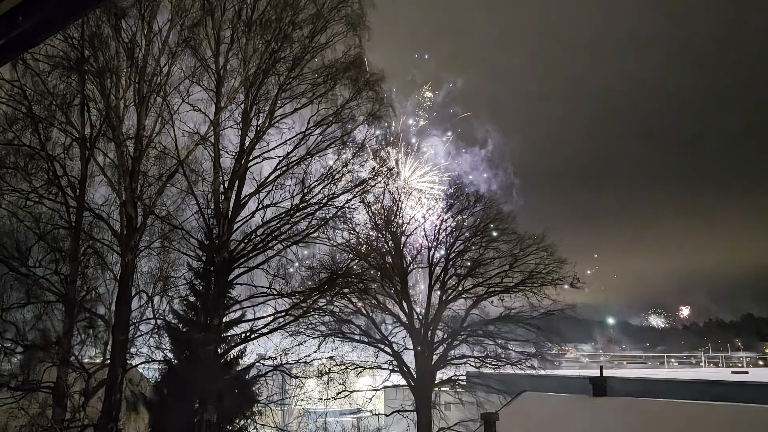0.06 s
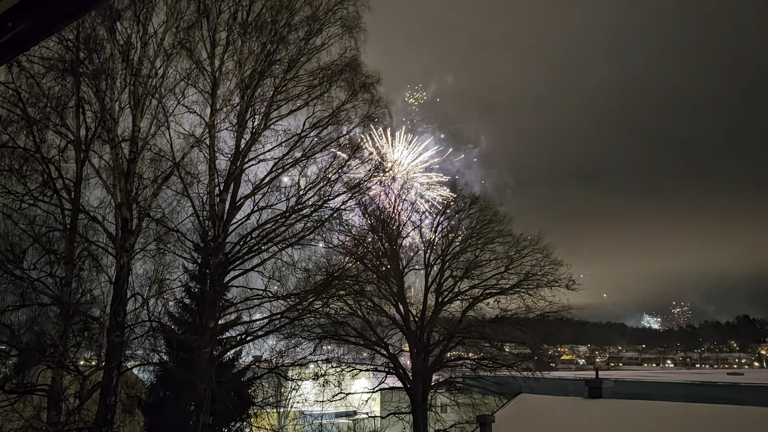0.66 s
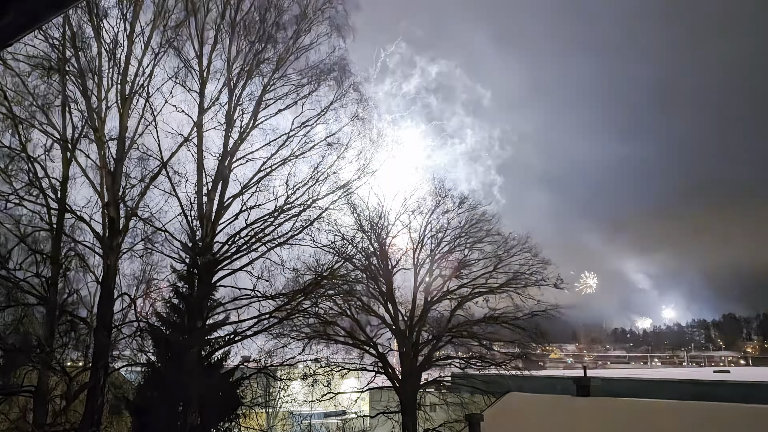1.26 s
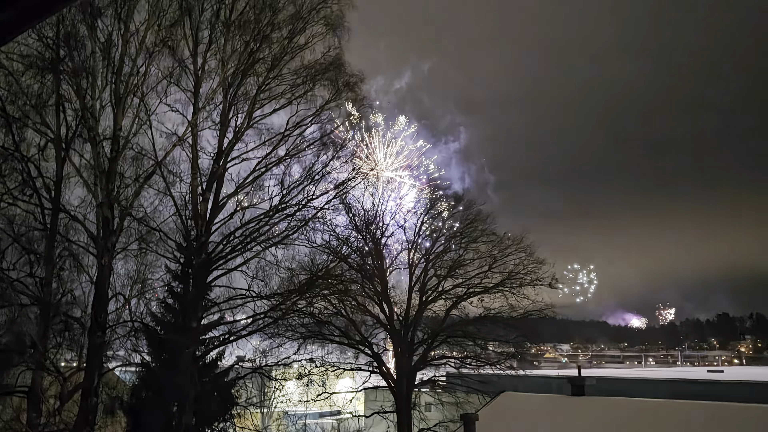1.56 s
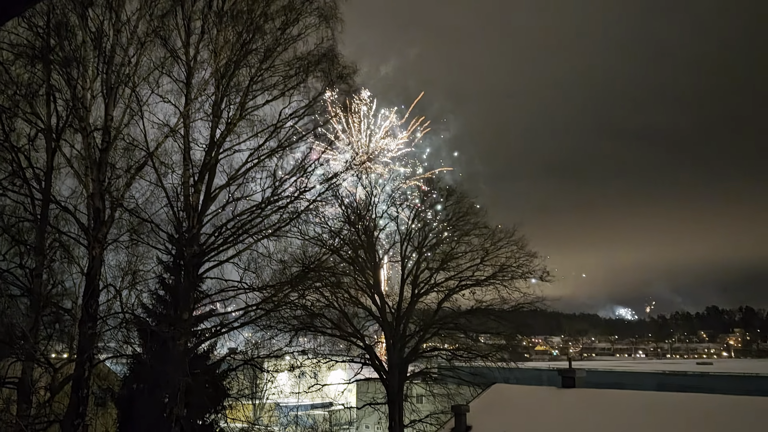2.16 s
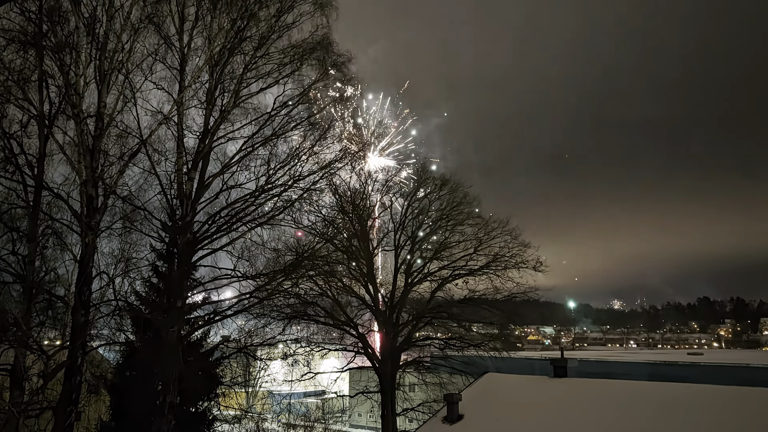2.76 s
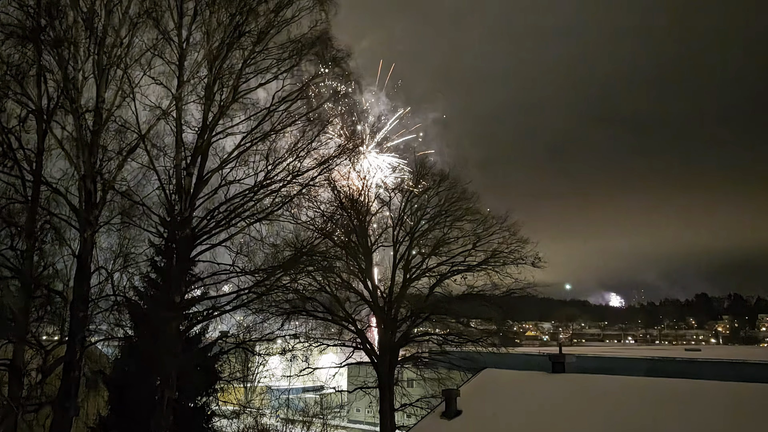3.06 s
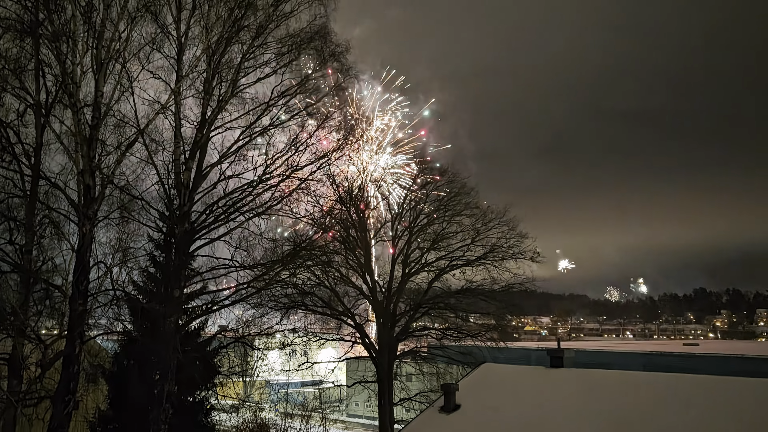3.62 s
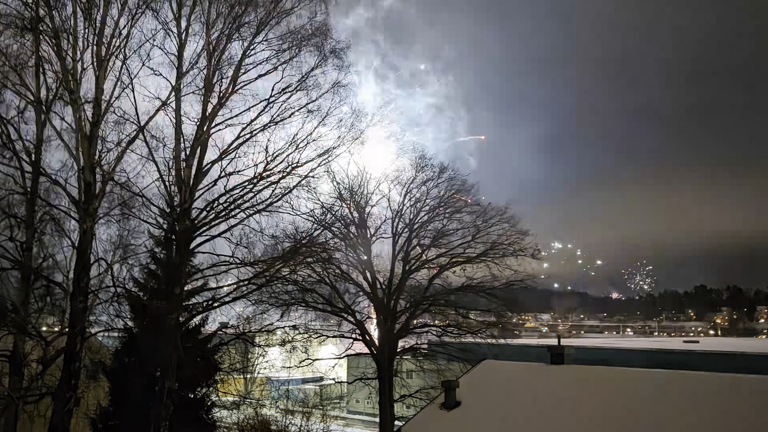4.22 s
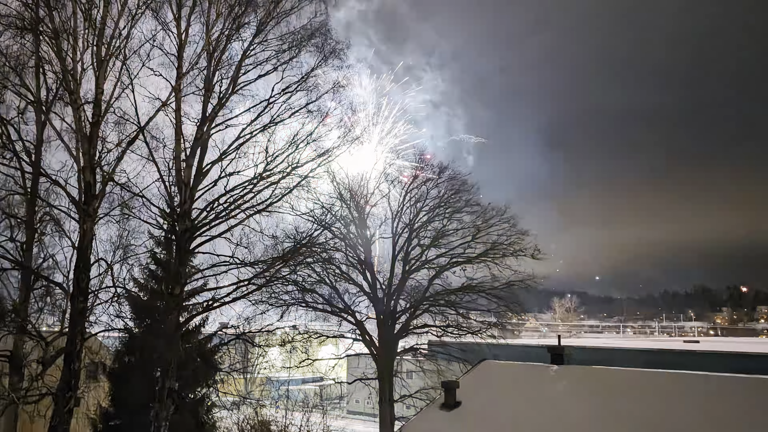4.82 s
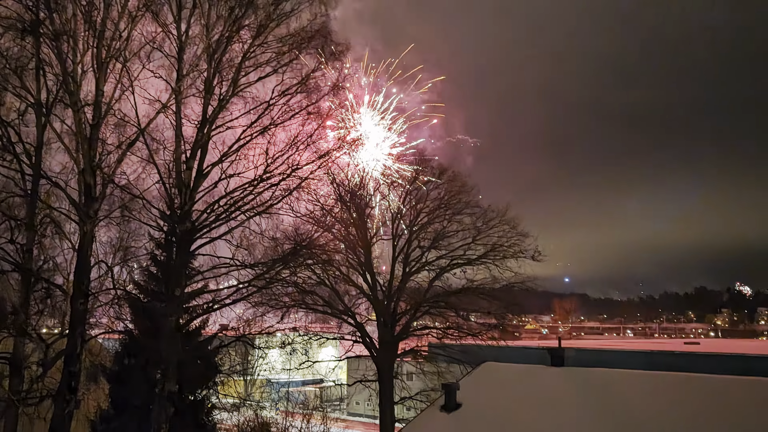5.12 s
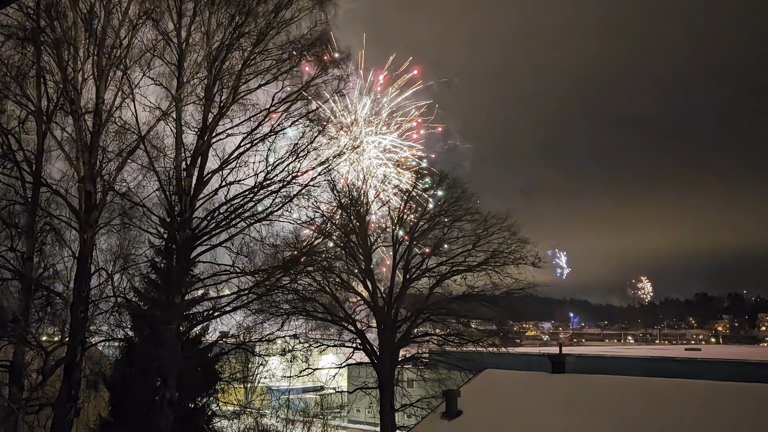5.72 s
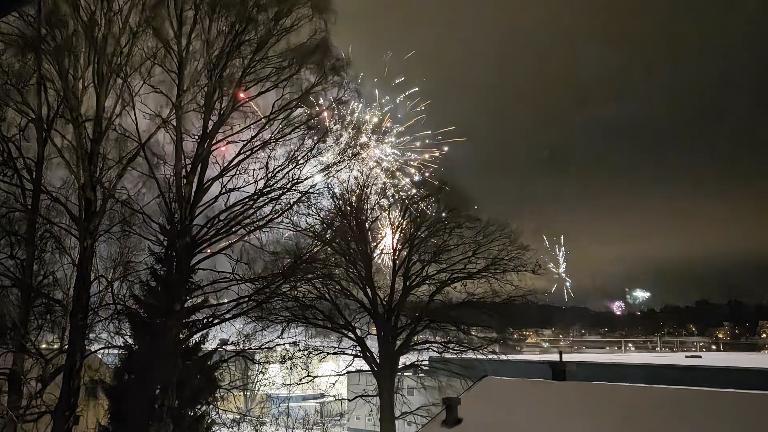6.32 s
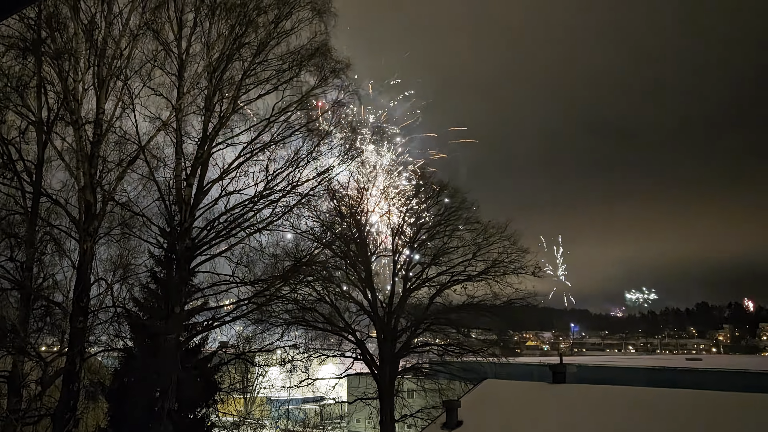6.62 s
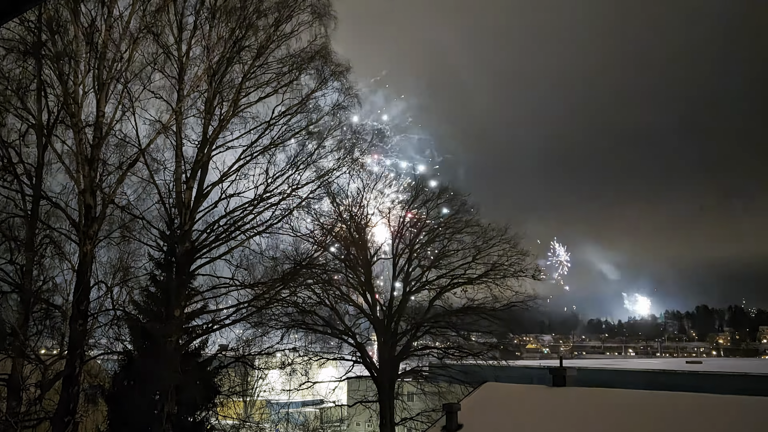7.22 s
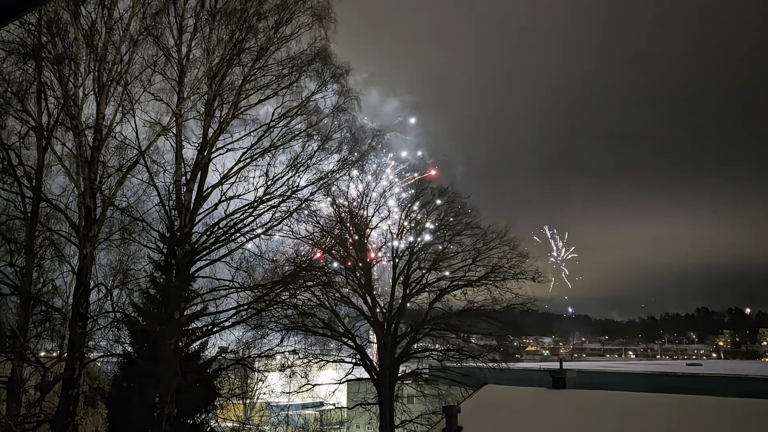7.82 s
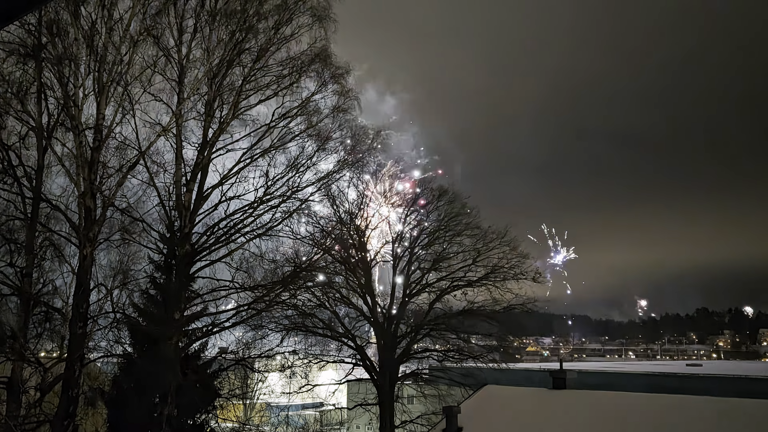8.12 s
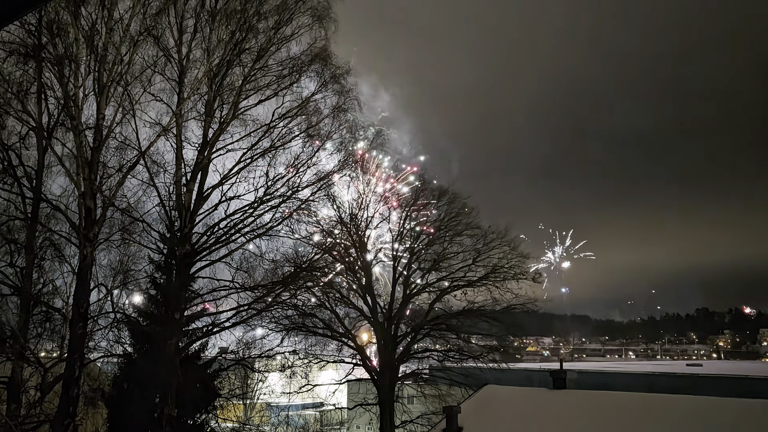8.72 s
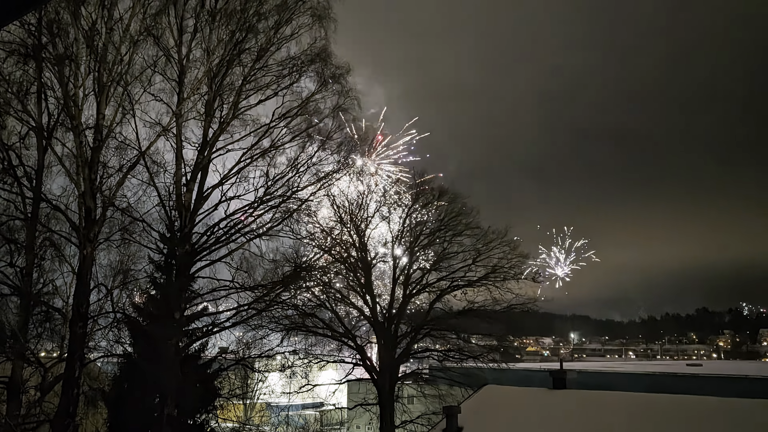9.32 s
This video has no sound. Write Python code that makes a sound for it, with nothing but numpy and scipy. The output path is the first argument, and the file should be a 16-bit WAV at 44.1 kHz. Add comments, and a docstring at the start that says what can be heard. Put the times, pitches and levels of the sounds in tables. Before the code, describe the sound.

A dense barrage of fireworks bursts overhead in sharp, thumping bangs that echo off houses, with crackles and distant thuds between.

```python
"""Snowy streets at night: a firework battery fires salvo after salvo, with other displays farther off.
Each shell is a sharp crack drawn out into a low thump, as the bass travels late over snow.
A house front throws it back; trees and streets scatter it into a long roll.
Crackling stars, distant thuds and the town's rumble fill the gaps. A limiter holds the peaks."""
import sys
import numpy as np
from scipy import signal
from scipy.fft import rfft, irfft
from scipy.io import wavfile
from scipy.ndimage import uniform_filter1d, minimum_filter1d

SR = 44100
rng = np.random.default_rng(int(sys.argv[2]) if len(sys.argv) > 2 else 0)


def master_out(mix):
    """Clip the mix to full scale and print it as 16-bit PCM to the path in sys.argv[1]."""
    frames = np.transpose(np.atleast_2d(mix))
    ceiling = np.clip(frames, -1, 1)
    pcm = np.round(ceiling * 32767).astype(np.int16)
    wavfile.write(sys.argv[1], SR, pcm)


N = 413216
N_FFT = 8192
HZ = np.maximum(np.fft.rfftfreq(N_FFT, 1 / SR), 1)
AGE_S = np.arange(N_FFT) / SR


# overhead bursts: t/s, charge/dB, echo/dB
NEAR_SHELLS = [(0.0243, 3, 3), (0.3586, 1.5, -3), (0.4052, -1.5, -1), (0.5274, 0, -3), (0.6457, -1.5, -4),
               (0.7614, 2.5, 0), (0.779, -3, -2), (1.3748, 2, -3), (1.4311, -1, -3), (1.498, 0, -3),
               (1.7452, -3.5, -6), (1.7952, 1.5, -6), (1.862, -3, -6), (1.9392, -0.5, -1), (2.1563, 0.5, 3),
               (3.1158, 0, -8), (3.1434, 3, -1), (3.477, 0.5, 3), (3.5714, 5, 5.5), (3.7483, 1, -1),
               (3.9808, 4, 2), (4.6557, 1.5, -5), (4.7882, -1, -3), (4.8296, -2.5, 1), (5.1763, 2.5, -4),
               (5.2, 1.5, 3), (5.4403, -1, -1), (5.4738, 1.5, 3), (5.5248, -1, -6), (5.5446, 1, 2),
               (5.617, -2, -8), (5.675, -1, -8), (5.7394, -1, -4), (5.754, 1, -3), (5.9134, 1, -2),
               (6.408, 0, -2), (6.8154, 1, -1), (6.9301, 0, -5), (7.018, -1, -1), (7.5052, 3, -2),
               (7.5516, -0.5, -7), (7.7604, 0.5, 0), (7.871, 0.5, 5), (8.5217, -2, -8), (8.5453, 1.5, 0),
               (8.6783, 1, -1)]
# two faces of a stepped house front: delay/s, level/dB
HOUSE_FACES = [(.0682, -9.5), (.0718, -5.5)]
# house-front echo: f/Hz, level/dB
ECHO_SPECTRUM = [(60, 6.5), (400, 21.5), (900, 18), (1700, 18.5), (2600, 5.5), (6000, 1.5), (9000, -10.5),
                 (16000, -16.5)]

def near_shells(level_db, click_db):
    """Bursts overhead, each with a bright double slap from a house front."""
    out = np.zeros((2, N))
    wall = min_phase(at_hz(ECHO_SPECTRUM, HZ))
    for t, charge_db, echo_db in NEAR_SHELLS:
        shell = min_phase(level_db + near_colour(charge_db, HZ) + casing_tear(spread_db=.8))
        add(out, t, blast(shell, lag_samples=-1, right_db=1, clutter_db=-2.5,
                          roof_s=.008, roof_spread_s=.0011, roof_db=-17))
        detour_s = rng.uniform(0, .002)
        for delay_s, face_db in HOUSE_FACES:
            # ledges scatter, the flat face returns one clean click
            slap = to_wave(wall * (scatter(t60_s=.026) + from_db(click_db)))
            add(out, t + delay_s + detour_s, from_db(face_db + echo_db) * slap)
    return out


def near_colour(charge_db, hz):
    """Overhead shell's level in dB: a stronger charge is louder and brighter."""
    thump, crack, edge = .79, .98, 1.08   # dB per dB of charge
    return charge_db * at_hz([(150, thump), (450, crack), (1200, crack), (5500, edge)], hz)


def casing_tear(spread_db):
    """No two casings tear alike: a random dB offset per octave."""
    octaves_hz = 100 * 2 ** np.arange(8)
    return np.interp(np.log(HZ), np.log(octaves_hz), spread_db * rng.standard_normal(8))


# direct blast: f/Hz, level/dB
BLAST_SPECTRUM = [(25, 2.5), (52, 24), (80, 32.5), (115, 38.5), (165, 35), (230, 29), (290, 26), (430, 36),
                  (780, 22.5), (1050, 26), (1600, 16.5), (5000, 2.5), (8000, -7), (16000, -15.5)]
# all-passes delaying the bass over snow: f/Hz, Q
SNOW_DISPERSION = [(110, 1.1), (330, 1.2)]
# scatter off nearby walls and roofs: f/Hz, level/dB
CLUTTER_SPECTRUM = [(40, 15), (100, 21.5), (400, 26.5), (1000, 21), (2500, 10.5), (6000, -3.5), (11000, -9),
                    (16000, -11)]

def blast(shell, lag_samples, right_db, clutter_db, roof_s, roof_spread_s, roof_db):
    """A pressure jump sweeps down into a thump, followed by a roof echo and close scatter."""
    front = min_phase(at_hz(BLAST_SPECTRUM, HZ))
    for hz, q in SNOW_DISPERSION:
        pole = 1 - (HZ / hz) ** 2 + 1j * HZ / (hz * q)
        front = front * pole.conj() / pole
    ear_lag_s = np.maximum([[lag_samples], [-lag_samples]], 0) / SR
    ears = delay(ear_lag_s) * from_db([[-right_db / 2], [right_db / 2]])
    clutter = from_db(clutter_db) * min_phase(at_hz(CLUTTER_SPECTRUM, HZ)) * scatter(t60_s=.044)
    roof = from_db(roof_db) * delay(abs(roof_s + roof_spread_s * rng.standard_normal()))
    return to_wave(shell * (front * ears * (1 + roof) + clutter))


# distant reports: t/s, level/dB, extra bass/dB, distance/m
FAR_SHELLS = [(1.126, -10, -2, 550), (1.25, -9, 7.5, 550), (1.543, -2, -3, 490), (1.629, -5, 3, 580),
              (2.4063, 3, -12, 190), (2.477, -7.5, -5, 500), (2.501, -0.5, -6, 700), (2.716, -10.5, 1, 230),
              (2.75, -6.5, -10, 800), (2.837, 0, -11.5, 880), (4.2469, -12, -14, 280),
              (4.467, -12, -14, 400), (4.8675, 1, -12, 400), (6.2215, -2.5, -3, 750), (6.9034, -4, 0, 300),
              (7.22, -4.5, -5, 600), (7.5406, -3, -7, 40), (7.999, -6, 1, 230), (8.2597, 4.5, -4, 170),
              (8.3734, 0.5, -8, 390), (8.895, -8.5, -2, 300), (8.9391, 2.5, -3.5, 80),
              (9.222, -2, -16, 700), (9.2882, 1, -4, 530), (9.3254, 4, -11, 670)]

def far_shells(gain_db, lag_samples, spread_samples):
    """Low-angle reports from the right: late at the left ear, with an earlier, stronger roof echo."""
    out = np.zeros((2, N))
    for t, *report in FAR_SHELLS:
        shell = min_phase(gain_db + far_colour(*report, HZ))
        lag = round(lag_samples + spread_samples * rng.standard_normal())
        add(out, t, blast(shell, lag, right_db=1.5, clutter_db=-.5,
                          roof_s=.0033, roof_spread_s=.0009, roof_db=-10))
    return out


def far_colour(level_db, bass_db, distance_m, hz):
    """Far report's level in dB: shell size sets the bass, air absorbs the treble."""
    air_db_per_khz_m = .0105
    air_db = np.minimum(air_db_per_khz_m * distance_m * hz / 1000, 70)
    return level_db + at_hz([(150, bass_db), (450, 0)], hz) - air_db


# early scatter off trees: f/Hz, half-octave level/dB
TREE_SPECTRUM = [(35, -61), (70, -31.5), (130, -23.5), (400, -29.5), (800, -38.5), (1500, -45), (3000, -53),
                 (6000, -51), (11000, -51), (16000, -58)]
# long roll through the streets: f/Hz, half-octave level/dB
STREET_SPECTRUM = [(35, -63), (65, -38), (120, -34.5), (280, -29.5), (450, -30), (750, -36), (1500, -37.5),
                   (2700, -44), (4500, -46), (8000, -57.5), (11000, -69), (15000, -79)]
# its decay: f/Hz, T60/s
STREET_DECAY = [(60, 2.02), (400, 1.87), (1500, 1.86), (4000, 1.16), (8000, 0.61), (15000, 0.94)]
# far barrage all over town: f/Hz, half-octave level/dB
TOWN_SPECTRUM = [(30, -72), (60, -50), (120, -40), (280, -41), (480, -35), (800, -41), (1500, -43),
                 (3000, -57.5), (6000, -67), (10000, -96), (16000, -106)]
# depth of the roll's clumps: f/Hz, spread/dB
CLUMP_DEPTH = [(120, 1.8), (500, 2.6), (1500, 1.6), (6000, 1.2)]

def street_roll(far_db, initial_db, patchy_db, follow_db_per_db):
    """Trees and streets return every burst, band by band, in uneven clumps over the town's rumble."""
    out = np.zeros((2, N))
    white = rng.standard_normal((2, 2, N))
    clumps = drift(70)
    starts = np.clip([round(row[0] * SR) for row in NEAR_SHELLS + FAR_SHELLS], 0, N - 1)
    reach_db = np.r_[np.zeros(len(NEAR_SHELLS)), np.full(len(FAR_SHELLS), far_db)]
    edges_hz = 25 * 2 ** np.arange(0, 9.6, .5)
    for k, (low, high) in enumerate(zip(edges_hz, edges_hz[1:])):
        hz = np.sqrt(low * high)
        band = bandpass(white[k % 2], low, high)
        shell_db = [near_colour(db, hz) for _, db, _ in NEAR_SHELLS]
        shell_db += [far_colour(*report, hz) for _, *report in FAR_SHELLS]
        energy = np.zeros(N)
        energy[starts] = from_db(reach_db + follow_db_per_db * np.array(shell_db)) ** 2
        energy[0] = from_db(initial_db) ** 2   # an earlier salvo still rolls
        trees = reverberate(energy, t60_s=.54, rise_s=.0028)
        streets = reverberate(energy, t60_s=at_hz(STREET_DECAY, hz), rise_s=.026)
        power = from_db(at_hz(TREE_SPECTRUM, hz)) ** 2 * trees
        power += from_db(at_hz(STREET_SPECTRUM, hz)) ** 2 * streets
        power += from_db(at_hz(TOWN_SPECTRUM, hz)) ** 2
        flutter_db = at_hz(CLUMP_DEPTH, hz) * clumps + patchy_db * drift(35)
        out += stereo(*band / band.std(), hz) * np.sqrt(power) * from_db(flutter_db)
    return out


def reverberate(energy, t60_s, rise_s):
    """Scattered energy builds after each burst, then decays."""
    fall = from_db(-120 / (t60_s * SR))
    rise = np.exp(-1 / (rise_s * SR))
    return signal.lfilter([1 - rise], [1, -fall - rise, fall * rise], energy + 1e-18)


# crackling stars: t/s, length/s, level/dB
STAR_FLURRIES = [(2.812, .29, -34), (4.558, .03, -29), (6.388, .03, -30.5), (9.35, .03, -22)]

def star_flurries(per_s, spread_db):
    """One star sets off the next at uneven intervals; rows of t/s, level/dB."""
    rows = []
    for t, length_s, db in STAR_FLURRIES:
        for _ in range(max(1, round(length_s * per_s))):
            rows.append((t, db + spread_db * rng.standard_normal()))
            t += rng.uniform(.5, 1.5) / per_s
    return rows


def stray_charges(per_s, range_db):
    """Small charges fire at random, most of them faint; rows of t/s, level/dB."""
    when, faintness = rng.random((2, int(per_s * N / SR)))
    return np.column_stack([when * N / SR, -range_db * np.sqrt(faintness)])


def pops(charges, band_hz, t60_s):
    """Each small charge clicks from its own direction with a short scatter; air takes the top."""
    out = np.zeros((2, N))
    for t, db in charges:
        left_lag_s = rng.integers(0, 24) / SR
        click = delay(np.array([[left_lag_s], [0]]))
        add(out, t, from_db(db) * to_wave(click + scatter(t60_s)))
    return bandpass(out + 1e-18, *band_hz)


# large, remote shells: t/s, peak/dB
BASS_BOOMS = [(3.645, -16), (5.85, -19), (7.572, -12.5)]

def booms(hz, t60_s):
    """Only the bass arrives: a few slow swings of pressure."""
    out = np.zeros((2, N))
    for t, db in BASS_BOOMS:
        envelope = from_db(db - 60 * AGE_S / t60_s)
        add(out, t, envelope[None] * np.sin(2 * np.pi * hz * AGE_S))
    return out


# hollow resonances between close walls: f/Hz, width/Hz, level/dB
WALL_MODES = [(231.3, 10.7, -5), (400, 30, -5), (509, 39, -14)]

def wall_ring(x):
    """Sound from all round excites the walls' resonances."""
    return x + sum(from_db(db) * signal.lfilter(*signal.iirpeak(hz, hz / width_hz, fs=SR), x)
                   for hz, width_hz, db in WALL_MODES)


def scatter(t60_s):
    """Stereo spectrum of a dying swarm of small reflections."""
    fade = from_db(-60 * AGE_S / t60_s)
    swarm = rng.standard_normal((2, N_FFT)) * fade / np.sqrt(np.sum(fade ** 2))
    return stereo(*rfft(swarm), HZ)


# scattered sound at the two ears: f/Hz, correlation
EAR_COHERENCE = [(120, 0.91), (280, 0.89), (500, 0.47), (1000, 0)]
# its balance: f/Hz, left minus right/dB
EAR_BALANCE = [(100, -.5), (450, -1), (1250, -3.5), (2400, 0.5), (4400, -5.5), (15000, -3.5)]

def stereo(mid, side, hz):
    """Two unrelated signals become left and right, alike in the bass only, leaning right."""
    coherence = at_hz(EAR_COHERENCE, hz)
    ear = np.array([[1], [-1]])
    pair = np.sqrt((1 + coherence) / 2) * mid + np.sqrt((1 - coherence) / 2) * side * ear
    return pair * from_db(ear * at_hz(EAR_BALANCE, hz) / 2)


def from_db(db):
    """Decibels to gain."""
    return 10 ** (np.asarray(db) / 20)


def at_hz(points, hz):
    """Interpolate on a log-frequency axis."""
    f, value = np.transpose(points)
    return np.interp(np.log(hz), np.log(f), value)


def drift(per_s):
    """Random curve through unit-spread points."""
    return np.interp(np.arange(N) / SR * per_s, np.arange(N // 20), rng.standard_normal(N // 20))


def min_phase(db):
    """Minimum-phase spectrum: nothing sounds before the front."""
    cepstrum = irfft(np.log(from_db(db)))
    cepstrum[1:N_FFT // 2] *= 2
    cepstrum[N_FFT // 2 + 1:] = 0
    return np.exp(rfft(cepstrum))


def delay(delay_s):
    """Spectrum of a pure delay."""
    return np.exp(-2j * np.pi * HZ * delay_s)


def to_wave(spectrum):
    """Spectrum to waveform, last quarter faded."""
    return irfft(spectrum) * np.clip(4 * (1 - AGE_S / AGE_S[-1]), 0, 1) ** 2


def bandpass(x, low_hz, high_hz):
    """Third-order band-pass."""
    return signal.sosfilt(signal.butter(3, [low_hz, high_hz], "band", fs=SR, output="sos"), x)


def add(out, t, sound):
    """Mix in a stereo sound at t seconds."""
    start = int(np.clip(round(t * SR), 0, N - 1))
    out[:, start:start + sound.shape[1]] += sound[:, :N - start]


def limiter(x, ceiling_db, release_db_per_s):
    """Gain drops within 1 ms on a peak and recovers steadily."""
    over_db = np.maximum(20 * np.log10(np.abs(x).max(axis=0) + 1e-9) - ceiling_db, 0)
    ramp_db = release_db_per_s * np.arange(N) / SR
    cut_db = np.maximum.accumulate(over_db + ramp_db) - ramp_db
    return x * from_db(uniform_filter1d(minimum_filter1d(-cut_db, size=45), size=45))


def scene():
    """Near and far shells, their roll, crackling stars and distant thuds."""
    near = near_shells(level_db=.6, click_db=-4.5)
    far = far_shells(gain_db=1, lag_samples=16.2, spread_samples=5.8)
    roll = from_db(-1.1) * street_roll(far_db=-5.5, initial_db=4, patchy_db=1.68, follow_db_per_db=.88)
    snaps = from_db(18.5) * pops(star_flurries(per_s=27, spread_db=1.5), band_hz=(750, 3700), t60_s=.02)
    crackle = from_db(-10) * pops(stray_charges(per_s=34, range_db=13), band_hz=(800, 3570), t60_s=.025)
    thuds = from_db(14.5) * pops(stray_charges(per_s=12, range_db=11), band_hz=(320, 720), t60_s=.037)
    return near + far + wall_ring(roll + thuds) + snaps + crackle + booms(hz=58, t60_s=.2)


def record(dry):
    """40 Hz high-pass, peak limiter, steep 15.8 kHz low-pass."""
    trimmed = signal.sosfilt(signal.butter(3, 40, "high", fs=SR, output="sos"), dry)
    limited = limiter(trimmed, ceiling_db=-.9, release_db_per_s=403)
    return signal.sosfilt(signal.ellip(10, .1, 90, 15800, fs=SR, output="sos"), limited)


dry = scene()
out = record(dry)
master_out(out)
```